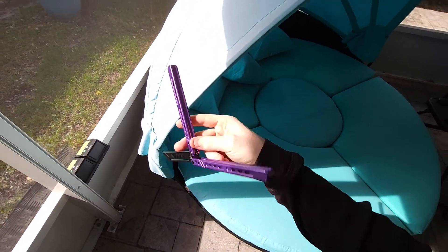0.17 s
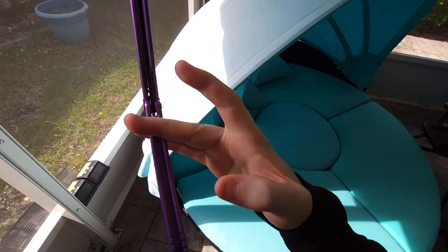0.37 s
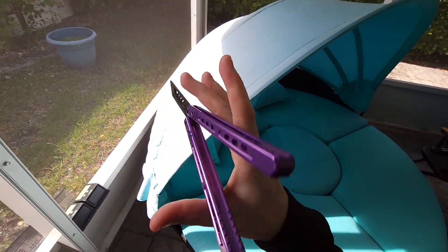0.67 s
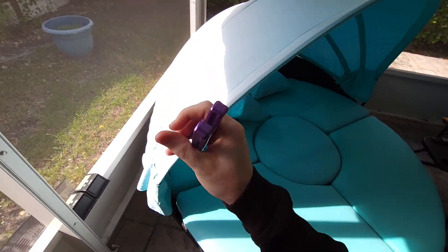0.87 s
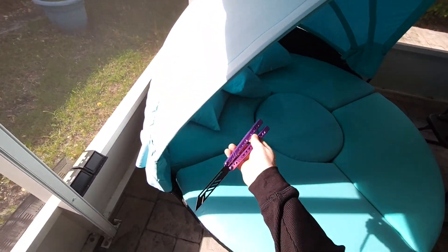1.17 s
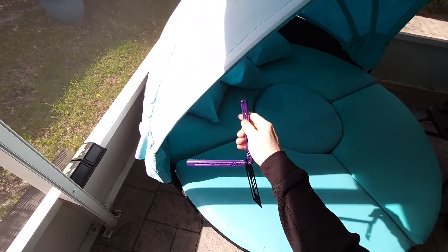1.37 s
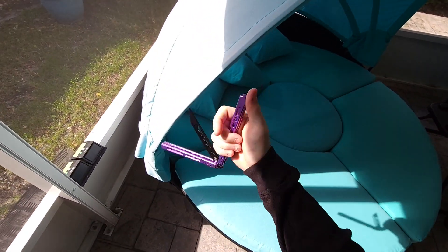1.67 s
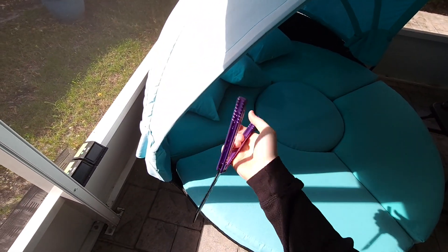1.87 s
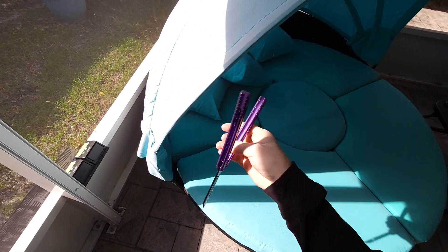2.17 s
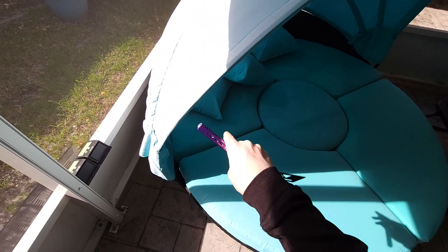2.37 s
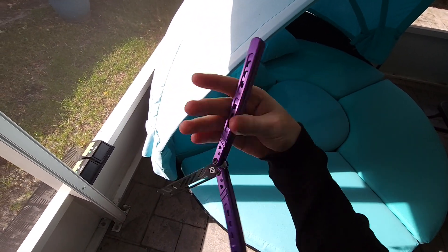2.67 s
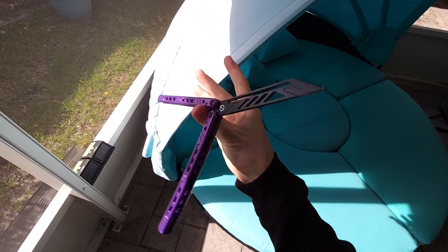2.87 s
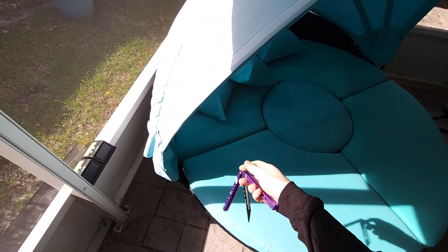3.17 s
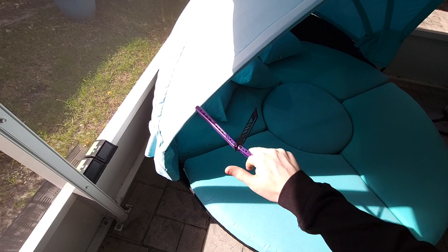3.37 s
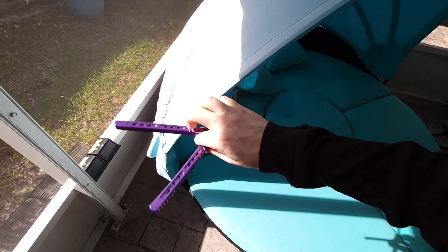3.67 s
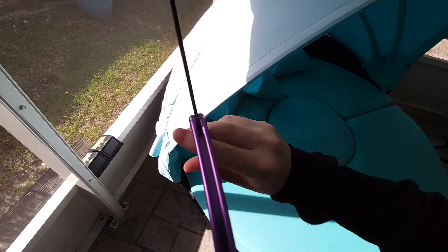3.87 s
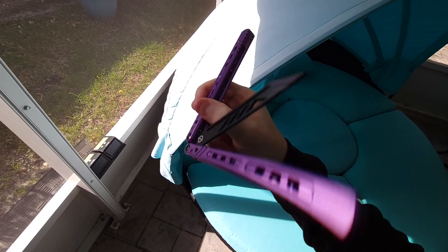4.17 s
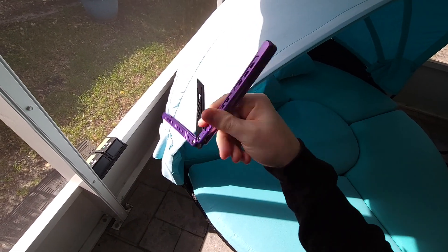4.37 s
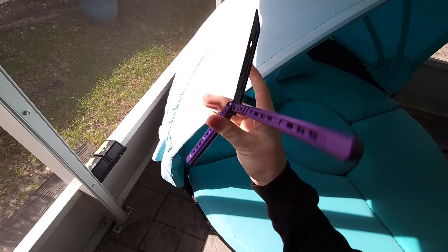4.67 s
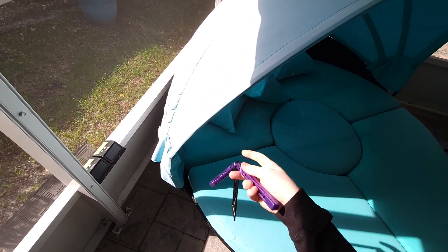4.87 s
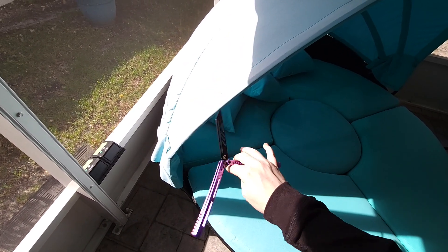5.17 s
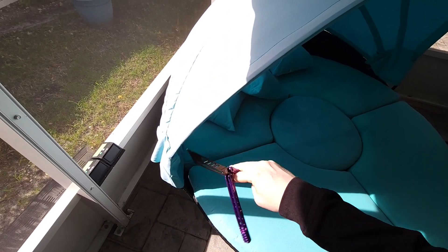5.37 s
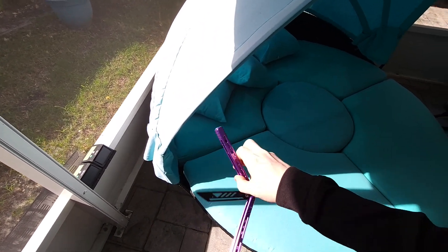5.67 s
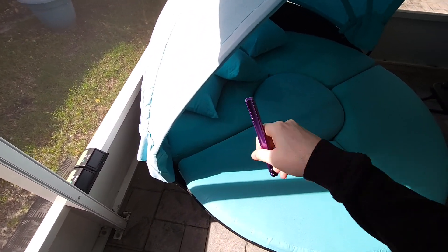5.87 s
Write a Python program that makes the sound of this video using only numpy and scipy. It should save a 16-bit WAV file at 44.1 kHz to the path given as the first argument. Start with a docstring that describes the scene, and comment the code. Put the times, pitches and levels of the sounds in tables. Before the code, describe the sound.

Sharp, dry metallic clacks from a hand-spun folding knife, very near and in stereo. A few clicks lead to a hard clustered slap that rattles out quickly, then over a second of near quiet. Further clicks and firm catches follow at uneven intervals, ending with a faint tick. A small porch gives a short scattered echo; low outdoor rumble and gentle air stay steady underneath.

```python
"""Butterfly knife on an open porch

A butterfly knife is flipped in one hand, close by. Each knock is filtered noise bursts plus dying modes: a sharp
clack, a hollow body, handle rings that the grip soon damps and a faint ring of steel; once the handles rattle.
The porch answers with near reflections and a short scattered tail. Shaped noise makes the low outdoor rumble,
the drifting air and a faint high hiss that swells now and then."""
import sys
import numpy as np
from scipy import signal
from scipy.fft import rfft, irfft
from scipy.io import wavfile

SR = 44100
rng = np.random.default_rng(int(sys.argv[2]) if len(sys.argv) > 2 else 0)


def put_to_file(sound):
    """Save the sound as 16-bit audio at rate SR, in the file named by the first command-line argument."""
    columns = np.atleast_2d(sound).T  # one column per channel
    safe = np.clip(columns, -1, 1)
    whole_steps = np.round(safe * 32767)
    wavfile.write(sys.argv[1], SR, whole_steps.astype(np.int16))


N = 265305
T = np.arange(8192) / SR  # time axis of one knock, s
HZ = np.fft.rfftfreq(len(T), 1 / SR)
ATTACK = round(0.005 * SR)  # samples over which a burst's level is set


def amp(db):
    """Decibels to gain."""
    return 10 ** (np.asarray(db) / 20)


def evened(x):
    """Scales to rms 1."""
    return x / np.sqrt(np.mean(x ** 2) + 1e-20)


def read(points, hz):
    """Reads a table on a log-frequency axis."""
    f, value = np.transpose(points)
    return np.interp(np.log(hz + 1), np.log(f + 1), value)


def add(mix, s, sound):
    """Adds a stereo sound at time s, cut off at the end of the mix."""
    part = mix[:, max(round(s * SR), 0):][:, :sound.shape[1]]
    part += sound[:, :part.shape[1]]


def panned(db):
    """Two gains of mean power 1, with the left this many dB above the right."""
    return evened(amp([[db / 2], [-db / 2]]))


# likeness of the two ears: (f/Hz, correlation [-1..1])
EAR_LIKENESS = [(60, 0.93), (130, 0.91), (290, 0.62), (640, -0.4), (1410, -0.58), (3100, -0.029),
                (6820, 0.052), (15000, -0.47)]
# balance of the two ears: (f/Hz, left over right level/dB)
EAR_BALANCE = [(60, 1), (150, 3.5), (380, -1), (950, 0.5), (2380, 4.5), (5980, 1), (15000, -1)]


def wide_noise(spectrum):
    """Steady noise of rms 1, alike in both ears in the bass and less so higher up."""
    hz = np.fft.rfftfreq(N, 1 / SR)
    a, b = rfft(rng.standard_normal((2, N)))
    same = np.clip(read(EAR_LIKENESS, hz), -1, 1)
    tilt = amp(read(EAR_BALANCE, hz) / 2)
    left = a * tilt
    right = (same * a + np.sqrt(1 - same ** 2) * b) / tilt
    return evened(irfft(np.array([left, right]) * amp(read(spectrum, hz)), N))


# relative spectrum of the distant rumble: (f/Hz, level/dB per Hz)
RUMBLE_SPECTRUM = [(12, -41.5), (20, -12), (44, -3.5), (70, 1), (124, -7), (177, -21), (225, -12.5),
                   (262, -19.5), (338, -14), (420, -23), (550, -51), (920, -120)]


def rumble():
    """A steady low outdoor rumble from shaped noise."""
    return amp(-42.6) * wide_noise(RUMBLE_SPECTRUM)


# relative spectrum of the soft air: (f/Hz, level/dB per Hz)
AIR_SPECTRUM = [(250, -30.5), (420, -4), (504, -7.5), (544, -3.5), (587, -9.5), (673, -7.5), (821, -6),
                (941, -8.5), (2020, -14), (3140, -22.5), (5590, -29), (7590, -32), (8190, -41.5),
                (15100, -46.5), (16000, -53)]
# slow drift of the air, before a lift of 5 dB: (t/s, level/dB)
AIR_DRIFT = [(0.0, -56.5), (0.67, -56), (0.94, -57.5), (2.71, -57.5), (6.02, -53.5)]


def air():
    """Soft air: shaped noise whose level drifts slowly."""
    drift_db = np.interp(np.arange(N) / SR, *np.transpose(AIR_DRIFT))
    return amp(drift_db + 5) * wide_noise(AIR_SPECTRUM)


def chatter(rise, fall, linger_db, linger, channels=2):
    """Metal meeting metal: a burst of tiny contacts in the loose pivots, dying within milliseconds."""
    decay = np.exp(-T / fall) + amp(linger_db) * np.exp(-T / linger)
    shape = (1 - np.exp(-(T / rise) ** 2)) * decay
    return shape * rng.standard_normal((channels, len(T)))


def coloured(x, gain_db):
    """Minimum-phase filter, so nothing sounds early; each channel has rms 1 over the attack."""
    cepstrum = irfft(np.log(amp(gain_db)))
    cepstrum[1:len(T) // 2] *= 2
    cepstrum[len(T) // 2 + 1:] = 0
    y = irfft(rfft(x) * np.exp(rfft(cepstrum)))
    return level_attack(y)


def level_attack(y):
    """Scales each channel to rms 1 over the attack."""
    return y / np.sqrt(np.mean(y[:, :ATTACK] ** 2, axis=1, keepdims=True))


def ring(hz, t60, turns, t=T, rise=0.0012):
    """One exponentially dying mode with a soft onset, scaled to rms 1 before onset and decay."""
    wave = np.sqrt(2) * np.sin(2 * np.pi * (hz * t + turns))
    return wave * np.exp(-np.log(1000) * t / t60) * (1 - np.exp(-t / rise))


def modes(table):
    """A set of modes; each blow starts them with other strengths, a little detuned."""
    total = 0
    for hz, db, t60 in table:
        strength = amp(db + 3 * rng.standard_normal((2, 1)))
        total = total + strength * ring(hz + rng.normal(0, 22), t60, rng.random((2, 1)))
    return total


# relative colour of the clack: (f/Hz, level/dB)
CLACK_COLOUR = [(3000, -29), (3800, -13), (4500, -6), (5100, -8.5), (5900, -7.5), (6500, -1), (7700, -1.5),
                (8300, -10.5), (9200, -19), (10500, -43)]
# higher modes of the steel and the handles, mean values: (f/Hz, level/dB re clack, t60/s)
STEEL_MODES = [(6385, -22, .1), (6400, -27.5, 0.12), (6840, -26, .13), (7230, -26.5, .14),
               (7323, -24, 0.14), (7390, -27.5, .13), (8000, -26.5, 0.11)]


def clack(burst, centre_hz):
    """The sharp contact; the place of the blow favours one cluster of modes."""
    focus_db = 7 * np.exp(-((HZ - centre_hz) / 420) ** 2)
    return coloured(burst, read(CLACK_COLOUR, HZ) + focus_db) + modes(STEEL_MODES)


# relative colour of the treble: (f/Hz, level/dB)
TREBLE_COLOUR = [(8000, -18), (9200, -8.5), (9900, 0.5), (10400, -11.5), (11800, -9.5), (12450, -2.5),
                 (12830, 6), (13200, -3.5), (13650, 1), (14300, -11.5), (14850, -3), (15300, -12.5),
                 (16500, -20.5)]
# short-lived top modes of the handles, mean values: (f/Hz, level/dB re treble, t60/s)
GLINT_MODES = [(9830, -14, 0.055), (12760, -12.5, .06), (13650, -15, .06), (15000, -15, 0.055)]


def treble(burst):
    """The bright edge of the contact, with a short glint of top modes."""
    low_cut_db = 30 * (HZ < TREBLE_COLOUR[0][0])
    return coloured(burst, read(TREBLE_COLOUR, HZ) - low_cut_db) + modes(GLINT_MODES)


# relative colour of the hollow handles: (f/Hz, level/dB)
BODY_COLOUR = [(400, -23.5), (900, -25), (1650, -20.5), (2100, 0), (2500, 7.5), (2950, 3), (3450, -6.5),
               (4100, -16.5), (5200, -35)]


def hollow_body():
    """The hollow handles speak below the clack, driven by a shorter burst."""
    blow = chatter(rise=0.00029, fall=0.0005, linger_db=-22.5, linger=0.0027, channels=1)
    return coloured(blow, read(BODY_COLOUR, HZ))


def handle_rings(held_db, swinging_hz, swinging_db, t60):
    """Bending modes of the held and the swinging handle; one blow sets both going together."""
    start = rng.random()
    held = amp(held_db + 1.3) * ring(2093, t60, start)
    return held + amp(swinging_db + 1.5) * ring(swinging_hz, t60, start)


def sing(hz, db, t60):
    """A long mode with a twin 28 Hz lower and 7 dB weaker, so the ring wavers."""
    t = np.arange(SR) / SR
    pair = ring(hz, t60, rng.random(), t) + amp(-7) * ring(hz - 28, t60, rng.random(), t)
    return amp(db - 0.5) * panned(3) * pair


# modes of the blade per contact, before sing() trims 0.5 dB and grip scales them:
# contact: [(f/Hz, level/dB re clack, t60/s)]
BLADE_MODES = {"pin": [(5590, -11.5, .12), (4550, -8, .025)], "handle": [(2854, -21.5, .28),
               (6520, -19.5, .07)], "catch": [(5480, -13.5, 0.13), (7220, -11, 0.12)]}


def blade(contact, clack_db, t60):
    """The blade sings more the looser the grip, heard as a longer handle t60."""
    looseness = (t60 / 0.05) ** 0.9  # 1 at a handle t60 of 0.05 s
    return amp(clack_db) * looseness * sum(sing(*mode) for mode in BLADE_MODES[contact])


# each kind of contact: (clack centre f/Hz, hollow body level/dB re clack, held handle level/dB re swinging handle)
# the body level is for a -30 dB clack, before a lift of 5 dB; the handles get their own small trims
CONTACT_KINDS = {"pin": (7100, -4.5, -6.5), "handle": (6700, -8, -13.5), "catch": (7240, -5, -8)}
BODY_DB_PER_DB = -0.2465  # harder blows put less of their sound into the hollow body
HANDLE_SIDE_DB = 4  # left over right
BEAM_DB, BEAM_DB_PER_DB, BEAM_FULL_DB = 2, 1.5, 2  # clack to the walls: full level, slope, left-right dB of the knee


def knock(direct, thrown, s, contact, clack_db, treble_db, side_db, hz, ring_db, t60):
    """One contact sounds clack, hollow body, handles and blade, straight ahead and into the porch."""
    clack_hz, body_db, held_db = CONTACT_KINDS[contact]
    burst = chatter(rise=0.00099, fall=0.00087, linger_db=-23.5, linger=0.0047)
    burst = burst + 0.28 * burst[::-1]  # the two ports hear partly the same contacts
    high = clack(burst, clack_hz) + amp(treble_db - 1) * treble(burst)
    high = amp(clack_db) * panned(side_db) * high
    body_db = body_db + BODY_DB_PER_DB * (clack_db + 30)
    body = amp(clack_db + body_db + 5) * panned(HANDLE_SIDE_DB) * hollow_body()
    handles = panned(HANDLE_SIDE_DB) * handle_rings(ring_db + held_db, hz, ring_db, t60)
    steel = blade(contact, clack_db, t60)
    add(direct, s, high + body + handles)
    # the clack is beamed, reaching the walls less as it turns right; the lower sounds spread all round
    thrown_db = BEAM_DB + BEAM_DB_PER_DB * min(side_db - BEAM_FULL_DB, 0)
    add(thrown, s, amp(thrown_db) * high + amp(1) * body + amp(-1) * handles)
    add(direct, s, steel)
    add(thrown, s, steel)


# the porch's scattered tail: (f/Hz, t60/s)
PORCH_DECAY = [(500, 0.05), (2300, 0.22), (5000, 0.21), (7300, 0.23), (10000, 0.26), (15000, 0.13)]
# its nearest surfaces, before a cut of 1 dB and a random spread in delay: (t/s of delay, level/dB)
NEAR_SURFACES = [(.0031, -15.5), (.0052, -18.5), (.0068, -20.5), (0.0109, -24), (0.0136, -26)]
# relative colour of what the cushions and walls give back: (f/Hz, level/dB)
RETURN_COLOUR = [(1000, 1), (2300, -2.5), (3600, -6.5), (5600, 0), (7300, 1), (9500, -1.5), (11300, -6),
                 (13300, 0.5), (15500, -3)]


def porch(x):
    """A few near reflections, then a short tail of scattered echoes that dies at its own rate per frequency."""
    size = SR // 2
    sparse = rng.random((2, size)) < 5000 / SR  # about 5000 echoes a second
    taps = rng.choice([-1., 1.], (2, size)) * sparse
    hz, t, z = signal.stft(taps, SR, nperseg=256)
    decay = np.exp(-np.log(1000) * t / read(PORCH_DECAY, hz)[:, None])
    tail = signal.istft(z * decay, SR, nperseg=256)[1]
    tail *= 1 - np.exp(-(np.arange(tail.shape[1]) / SR / 0.0057) ** 2)  # builds up over some 6 ms
    colour = amp(-16 + read(RETURN_COLOUR, np.fft.rfftfreq(tail.shape[1], 1 / SR)))
    tail = irfft(rfft(tail / np.linalg.norm(tail[0])) * colour)
    for delay, db in NEAR_SURFACES:
        for side in tail:
            side[round(delay * rng.uniform(0.92, 1.08) * SR)] += amp(db - 1)
    return signal.fftconvolve(x, tail, axes=1)[:, :N]


# a handle lands on a finger, before sing() trims 0.5 dB: (t/s, f/Hz, level/dB, t60/s)
FINGER_LANDINGS = [(0.7885, 680, -35, 0.015), (0.794, 1180, -33, .02), (3.961, 968, -39, 0.025)]


def finger_taps(direct, thrown):
    """Dull, quickly damped taps as a handle lands on a finger."""
    for s, *mode in FINGER_LANDINGS:
        tap = sing(*mode)
        add(direct, s, tap)
        add(thrown, s, tap)


RATTLE_START_S, RATTLE_GAP_GROWTH_S, RATTLE_T60_S = 0.8018, 0.0031, 0.045
RATTLE_DB, RATTLE_RING_DB, RATTLE_FADE_DB = -24, -20.5, -2.0  # first clack, first ring, change per bounce
RATTLE_HZ, RATTLE_RISE_HZ = 2370, 20.98  # first ring, change per bounce


def rattle():
    """Six bounces of the loose handles after the hardest slap: ever wider gaps, weaker, a little higher."""
    bounces = []
    for k in range(6):
        s = RATTLE_START_S + RATTLE_GAP_GROWTH_S * k * (k + 1) / 2
        fade_db = RATTLE_FADE_DB * k
        hz = RATTLE_HZ + RATTLE_RISE_HZ * k
        # treble -14 dB and left-right 6 dB on every bounce
        bounces.append((s, "handle", RATTLE_DB + fade_db, -14, 6, hz, RATTLE_RING_DB + fade_db, RATTLE_T60_S))
    return bounces


# one row a knock; a handle meets the blade's stop "pin", the other "handle", or ends in a "catch" by the hand:
# (t/s, contact, clack level/dB over the first 5 ms before its added modes, treble level/dB re clack before a 1 dB cut,
#  left over right level/dB, swinging handle f/Hz, its level/dB before a 1.5 dB lift, t60/s that the grip allows)
KNOCK_CUES = [(0.1383, "pin", -30.5, -14.5, 8, 2275, -21, 0.09),
              (0.188, "pin", -32, -21, 14, 2203, -20, 0.053),
              (0.2105, "pin", -44, -20, 16, 2193, -28.5, 0.048),
              (0.4355, "handle", -23.5, -21.5, -2, 2350, -26.5, .14),
              (0.6801, "pin", -30, -15, 0, 2164, -15, .039),
              (0.7758, "handle", -17.5, -11.5, -4.5, 2357, -11.5, 0.052),
              (0.7878, "handle", -19, -12, 17, 2386, -14.5, 0.037),
              (0.7933, "handle", -15.5, -7.5, 24, 2362, -9, 0.031),
              (0.799, "handle", -14.5, -10.5, 2, 2590, -29, .035),
              (0.8726, "handle", -30, -13, 6, 2487, -36, 0.13),
              (0.883, "handle", -37, -22, 8, 2499, -34, 0.092),
              (1.026, "catch", -57.5, -9, 5.5, 2310, -66, .027),
              (2.2081, "pin", -30, -20, 14, 2185, -18.5, 0.046),
              (2.2289, "pin", -33.5, -23, 8, 2230, -20, 0.043),
              (2.2982, "handle", -18, -12.5, 0, 2354, -9, 0.048),
              (2.3885, "pin", -28.5, -11.5, 6, 2235, -21, 0.029),
              (2.6124, "pin", -31, -22, 5.5, 2157, -28.5, .043),
              (2.9961, "pin", -38.5, -13.5, 9, 2110, -29, 0.086),
              (3.3153, "catch", -23.5, -16.5, 4.5, 2370, -46, 0.037),
              (3.6624, "pin", -27, -13.5, 12, 2178, -17.5, 0.046),
              (3.7639, "pin", -36.5, -15, 5, 2172, -26, 0.057),
              (3.96, "catch", -52, -17, 4, 2130, -62, 0.022),
              (4.3113, "catch", -17, -11.5, -5, 2115, -17, 0.017),
              (4.3286, "catch", -28.5, -17, -1, 2100, -27, 0.019),
              (5.0377, "catch", -19, -17.5, 3.5, 2380, -22.5, 0.017),
              (5.0692, "catch", -45.5, -11, -9, 2160, -40, 0.064),
              (5.3365, "handle", -25.5, -13.5, 1.5, 2300, -18, 0.044),
              (5.4192, "handle", -48.5, -28, 5, 2350, -54, .025),
              (5.891, "pin", -37, -22.5, 1, 2204, -29.5, 0.031)]
PORT_DELAY_S = 0.00013  # the left port hears the knife later


def knife():
    """All contacts: the sound straight to the two microphone ports, and the sound thrown into the porch."""
    direct, thrown = np.zeros((2, 2, N))
    for cue in KNOCK_CUES + rattle():
        knock(direct, thrown, *cue)
    finger_taps(direct, thrown)
    direct[0] = np.roll(direct[0], round(PORT_DELAY_S * SR))
    return direct, thrown


# swells of the hiss: (start t/s, length t/s, level/dB at the end)
HISS_SWELLS = [(1.85, 0.39, -64), (2.63, 0.054, -70.5), (4.55, 0.52, -64.5)]
# relative spectrum of the hiss: (f/Hz, level/dB per Hz)
HISS_SPECTRUM = [(2000, -26.5), (4800, 6), (7500, -0.5), (9000, -7.5), (11800, -15), (13200, 0), (15400, 3),
                 (16200, -14)]


def hiss_swells():
    """A faint high hiss: each swell fades in, grows slowly and drops away."""
    attack_s, release_s, growth_db_per_s = 0.064, 0.03, 10
    gain = np.zeros(N)
    for start, length, db in HISS_SWELLS:
        t = np.arange(N) / SR - start
        gate = np.clip(t / attack_s, 0, 1) * np.clip(1 - (t - length) / release_s, 0, 1)
        gain += gate * amp(db + growth_db_per_s * np.minimum(t - length, 0))
    return gain * wide_noise(HISS_SPECTRUM)


def scene():
    """The knife, its reflections and the outdoor bed."""
    direct, thrown = knife()
    return direct + porch(thrown) + rumble() + air() + hiss_swells()


def record(dry):
    """Full-scale limit, then a steep low-pass at 16.3 kHz."""
    low_pass = signal.firwin(511, 16300, window=("kaiser", 9), fs=SR)
    return signal.oaconvolve(np.clip(dry, -1, 1), low_pass[None], "same")


dry = scene()
out = record(dry)
put_to_file(out)
```